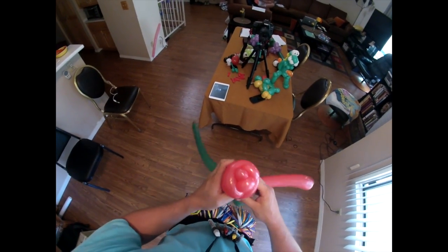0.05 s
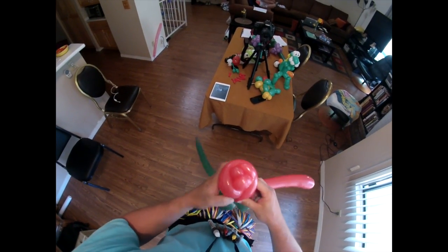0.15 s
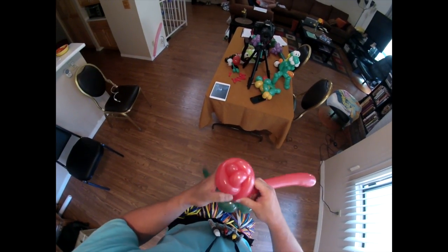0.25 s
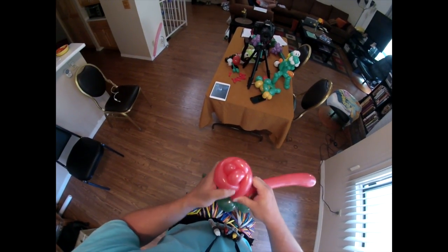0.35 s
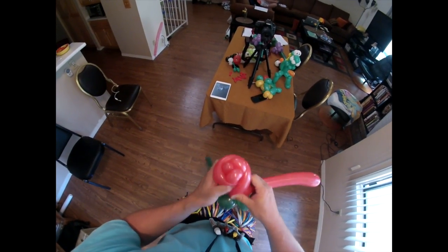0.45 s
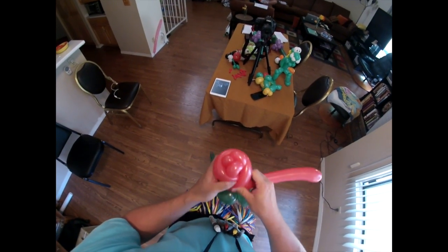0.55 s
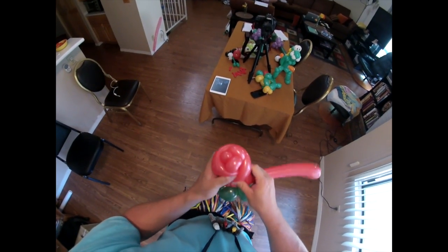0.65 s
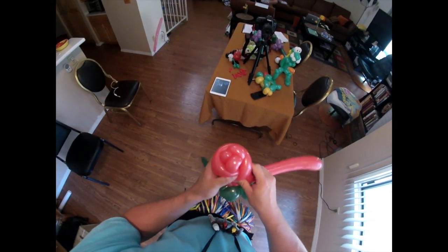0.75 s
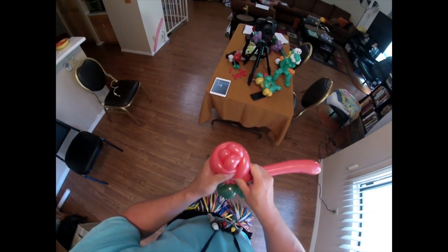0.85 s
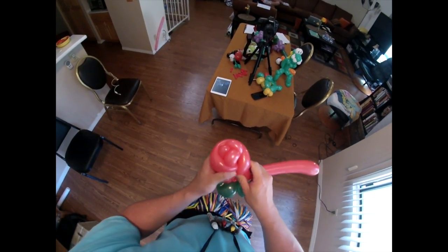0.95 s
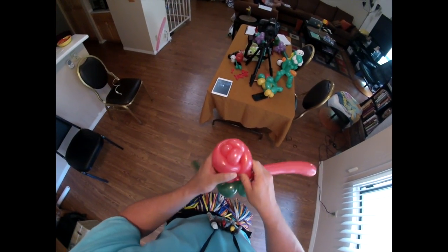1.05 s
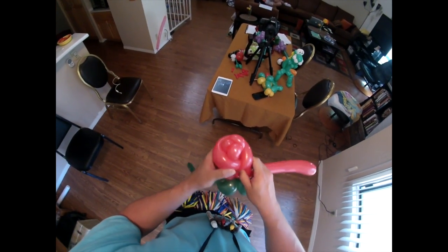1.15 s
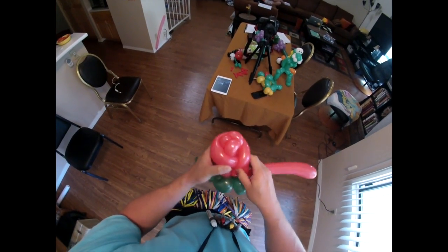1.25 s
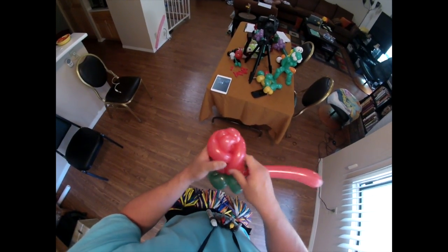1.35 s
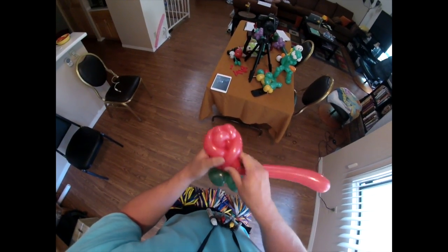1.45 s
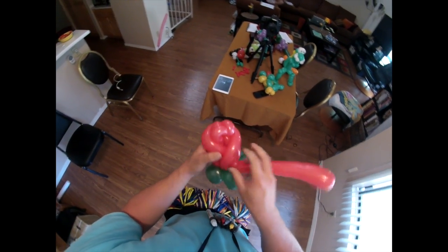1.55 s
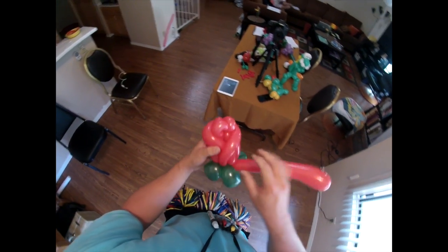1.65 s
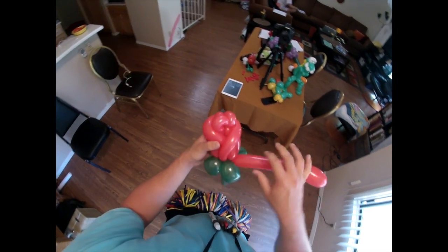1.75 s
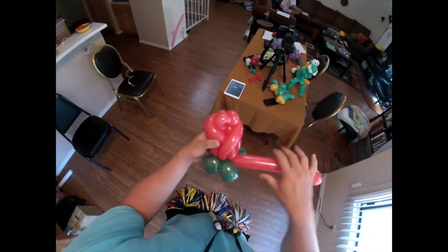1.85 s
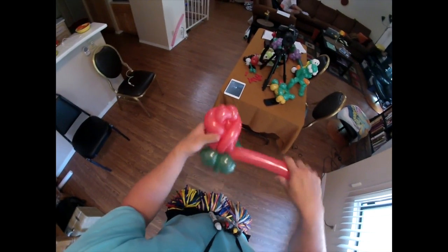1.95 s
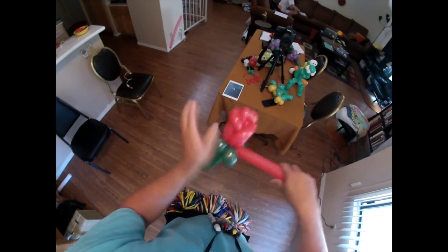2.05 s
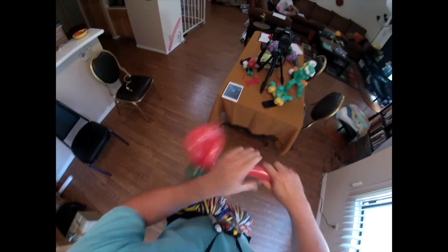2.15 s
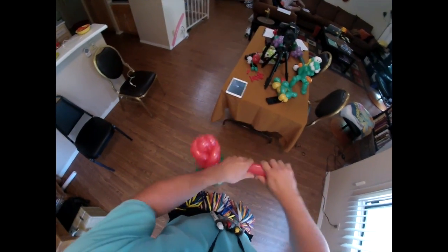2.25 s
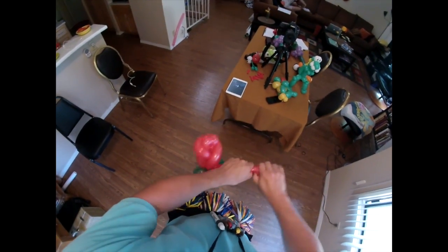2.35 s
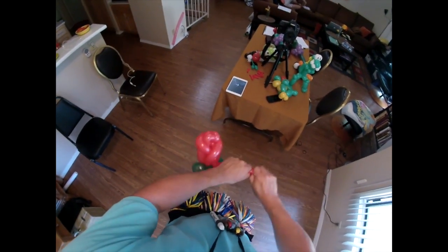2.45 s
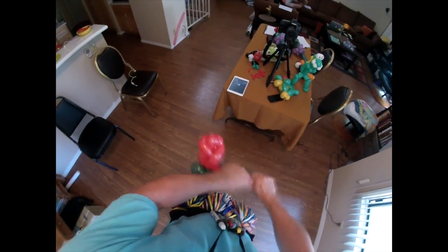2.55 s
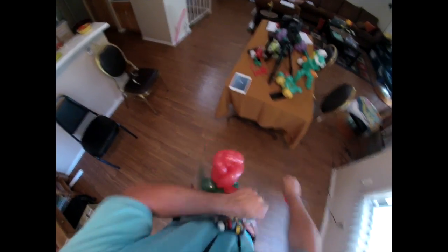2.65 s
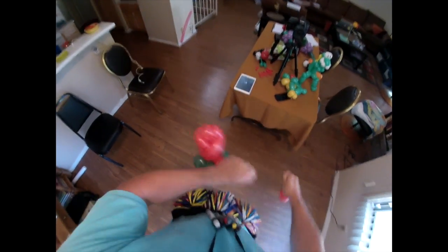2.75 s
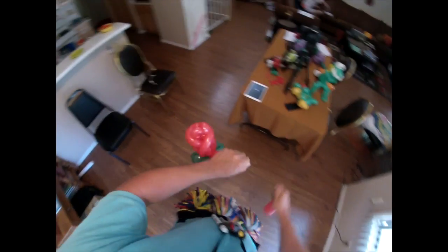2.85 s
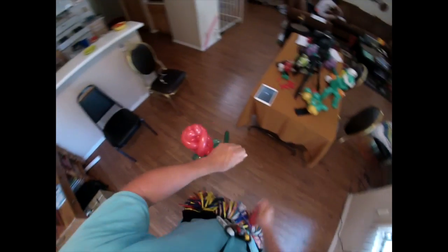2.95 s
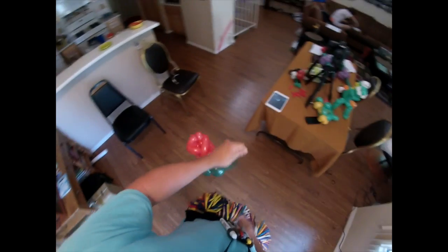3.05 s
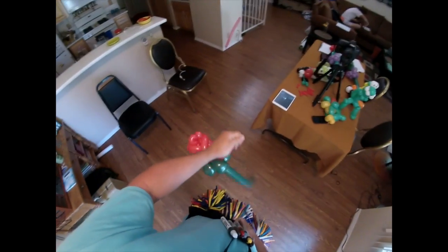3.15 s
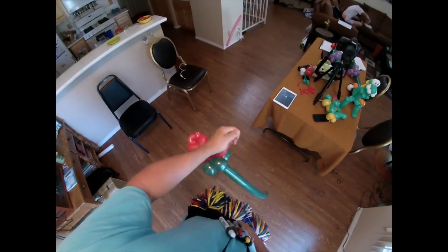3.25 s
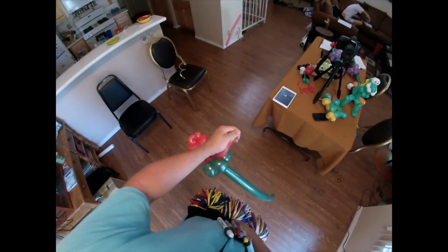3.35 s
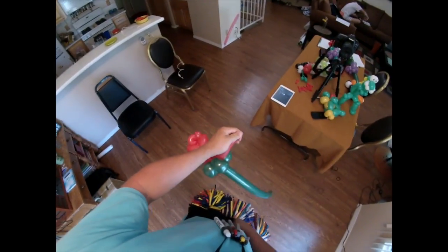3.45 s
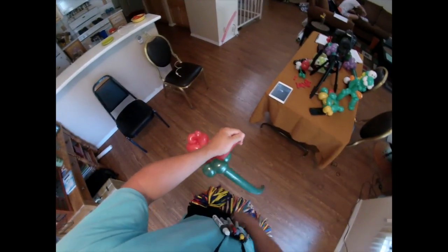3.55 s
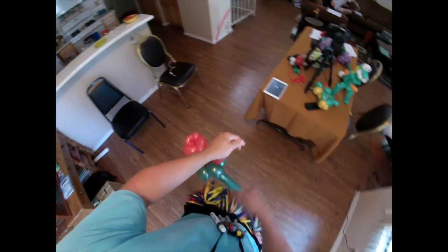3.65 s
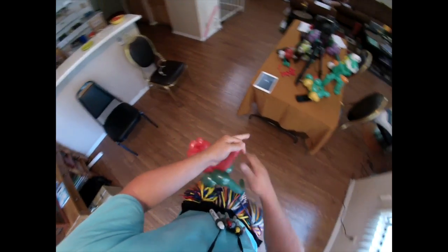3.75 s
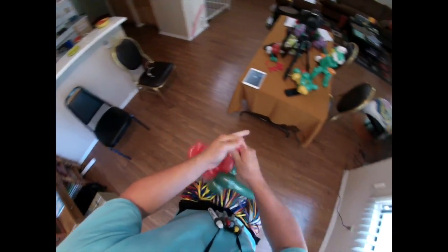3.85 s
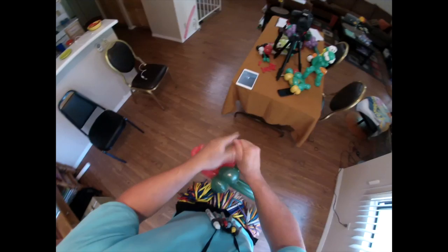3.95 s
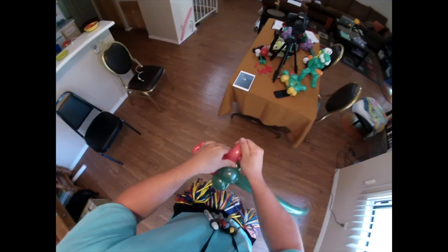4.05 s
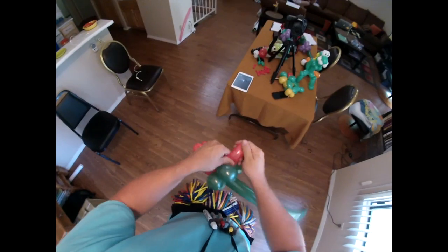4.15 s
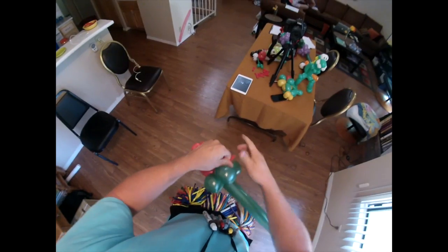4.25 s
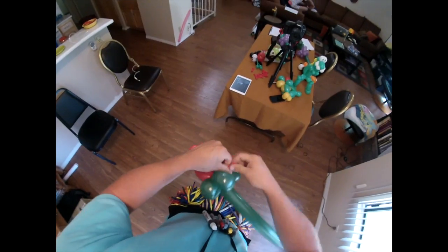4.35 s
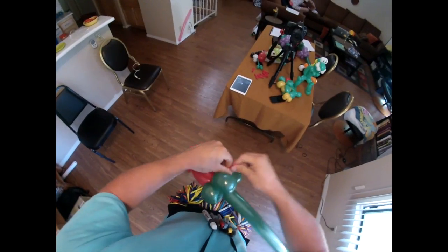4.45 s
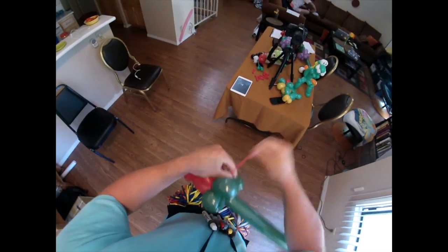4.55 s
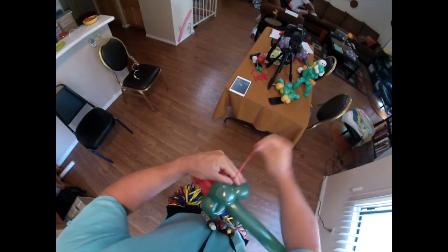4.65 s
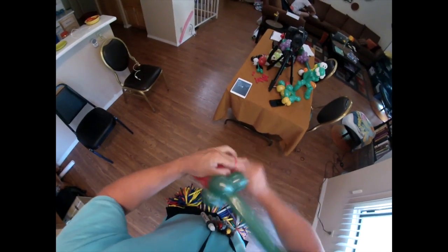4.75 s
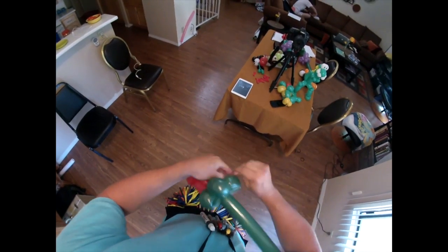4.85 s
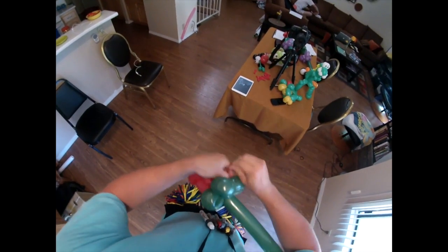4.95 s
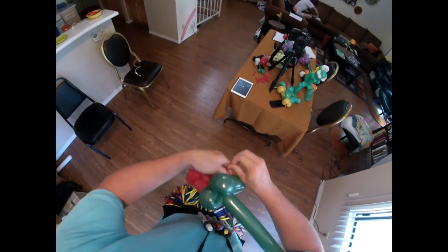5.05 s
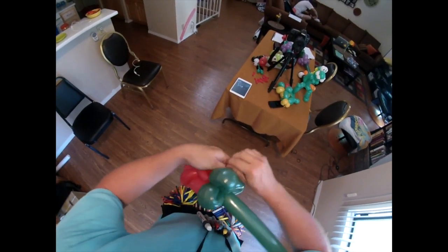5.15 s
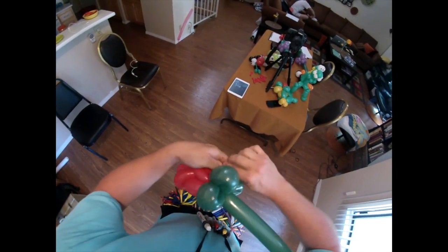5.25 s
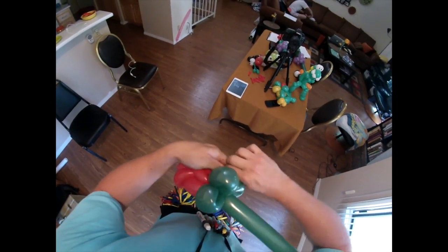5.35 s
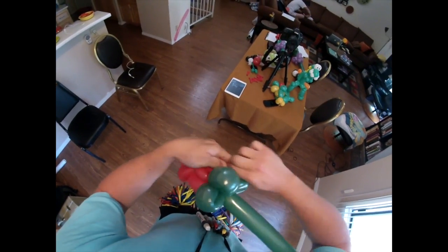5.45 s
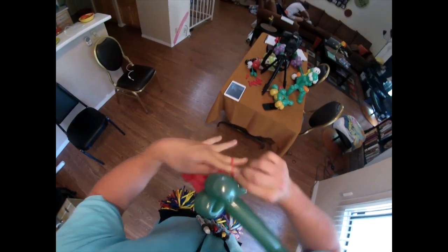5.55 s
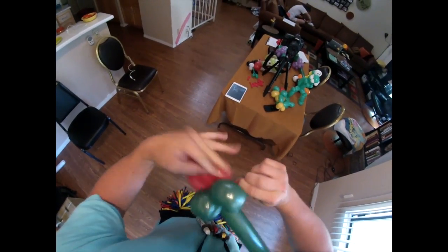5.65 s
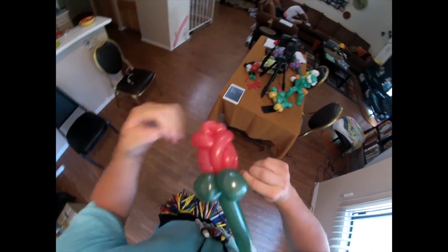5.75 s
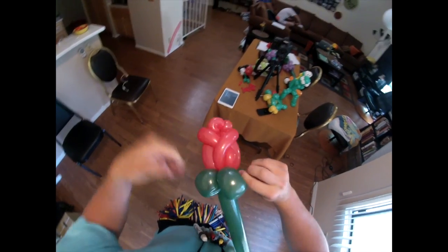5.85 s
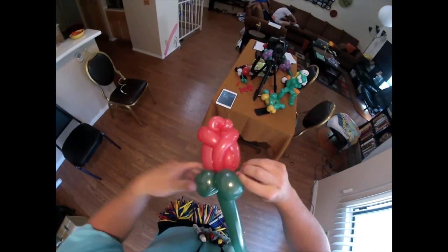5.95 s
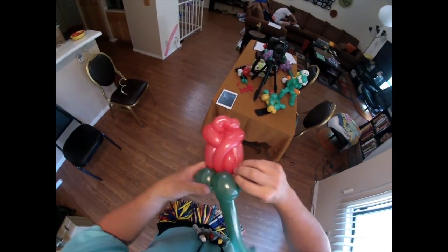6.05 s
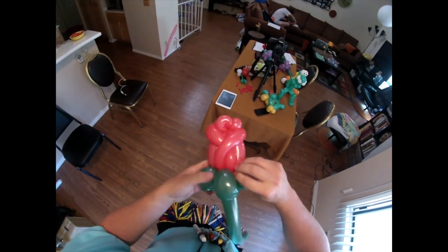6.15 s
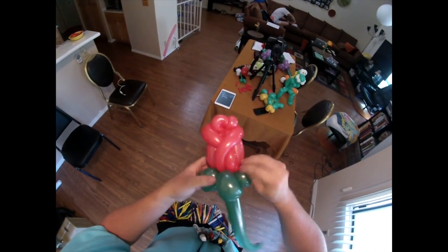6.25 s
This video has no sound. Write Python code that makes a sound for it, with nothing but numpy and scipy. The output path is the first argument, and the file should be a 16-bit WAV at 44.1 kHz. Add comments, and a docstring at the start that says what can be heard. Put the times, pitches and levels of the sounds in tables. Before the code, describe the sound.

Very close, in a living room, hands work latex balloons beneath a head-worn microphone. From 0 s dense rubbing squeaks and crackles, with hollow resonance around 2 kHz; short creaks at 0.25 and 0.75 s, then a cluster of sharp ticks from 1.0 to 1.7 s with a dull bump near 1.2. Rubbing fades by 1.8 to 2.5 s, with faint creaks and soft bumps. At 2.67 s a balloon tears: a loud, clipped pop with quick flaps, a low slosh of pressure, and air rushing out with thin high whistles until 3 s. A sharp tick and squeaks follow at 3.15 s, then near quiet. Brighter snaps and squeaks come at 4.0 and 4.28 s, then small ticks, creaks and muffled bumps until 6.3 s. Low air rumble and steady hiss persist, with millisecond dropouts about four times a second and a short room echo.

```python
"""Balloon twisting and a pop

Hands twist and knot latex balloons in a living room, close to a head-worn camera.
Rubber sticks and slips on rubber and skin: random slips drive resonant filters, squeaks are wavering sines.
One balloon is torn open: noise bursts make the pop, shaped noise the rush of air and thin tones the whistle.
The moving head stirs slow, low-pitched air at the microphone; dull bumps and steady hiss lie beneath.
The recorder restarts about four times a second, and each restart cuts the level for a few milliseconds."""
import sys
import numpy as np
from scipy import signal
from scipy.fft import rfft, irfft
from scipy.io import wavfile
from scipy.ndimage import uniform_filter1d

SR = 44100
rng = np.random.default_rng(int(sys.argv[2]) if len(sys.argv) > 2 else 0)


def transcribe(u):
    """Save the signal u as a 16-bit wav file named by the first command-line argument.

    u: samples, shape (n,) or (channels, n), limited to [-1, 1]; the rate is SR.
    q: integer samples, one column per channel.
    """
    v = np.clip(np.atleast_2d(u).T, -1, 1)
    q = np.round(v * 32767).astype(np.int16)
    wavfile.write(sys.argv[1], SR, q)


N = 277830  # length in samples

# Hands working the rubber, before a small trim: start_s [s], level_db [dB], bright_db [dB], hollow_db [dB]
RUBBING = [(0.0, -33, 1, 0), (0.64, -35, 0, 4.5), (0.83, -46, 3, 5.5), (1.07, -38.5, 4, -2),
           (1.27, -40.5, 2, -17), (1.52, -34, 0, 5), (1.76, -49.5, 5.5, 1), (2.1, -49, 0.5, -8),
           (2.66, -46.5, 1, 7.5), (2.67, -78, 0, 0), (2.97, -80, 0, 0), (3.0, -45, 4, 7.5),
           (3.67, -56, 5.5, -2), (3.87, -40.5, 1, 5), (4.06, -45.5, 3, -2), (4.3, -35.5, -9, -1),
           (4.75, -46.5, 3, 8.5), (5.29, -38, -0.5, 2.5), (5.74, -41.5, 1.5, 4), (5.88, -50.5, -4, -4),
           (6.08, -46.5, 4.5, 7), (6.3, -45, 2, -4)]
# Resonances of the balloons' air chambers, before chance spread: pitch_hz [Hz], width_hz [Hz], level_db [dB]
CHAMBERS = [(830, 7.1, -25), (1380, 19, -13), (1994, 5.5, 6.5), (2334, 130, 1.5), (3250, 230, -13),
            (4195, 114, -7), (5070, 35, -13), (5330, 110, -35), (6683, 310, -13), (8100, 110, -21.5),
            (9400, 36, -39), (11300, 370, -26.5)]
# Broad colour of a slip on the skin: pitch_hz [Hz], density_db [dB per Hz, relative]
SKIN_COLOUR = [(180, -32), (300, -15), (1220, -5.5), (1370, 0.5), (1810, -5.5), (2280, -1), (2610, -3.5),
               (6050, -15), (6790, -15.5), (15500, -37.5)]
# Slow air at the microphone, before surges and ducking: start_s [s], level_db [dB]
AIR_LEVEL = [(0.0, -34), (0.63, -27), (1.1, -39.5), (1.16, -18), (1.24, -35.5), (1.65, -29.5),
             (1.77, -34.5), (2.45, -17.5), (2.63, -31), (2.7, -3), (2.75, -17), (2.82, 4.5), (3.14, -27.5),
             (3.18, -21), (3.58, -36.5), (3.65, -19.5), (3.89, -30.5), (4.0, -24), (4.44, -29), (5.07, -26),
             (5.65, -31), (5.77, -16.5), (6.05, -27.5), (6.3, -39.5)]
# Spectrum of the slow air: pitch_hz [Hz], density_db [dB per Hz, relative]
AIR_COLOUR = [(4.7, -65), (8.0, 10.5), (23, -2.5), (30, -14), (43, -7.5), (60, -17.5), (110, -39.5),
              (140, -63), (240, -120)]
# Spectrum of the flutter above it: pitch_hz [Hz], density_db [dB per Hz, relative]
FLUTTER_COLOUR = [(41, -50), (70, 4), (119, -1.5), (211, -4.5), (408, -22), (600, -19), (780, -23),
                  (1320, -120)]
# Sloshes of air after the pop, before their soft onset: start_s [s], pitch_hz [Hz], t60_s [s], level_db [dB]
SLOSHES = [(2.682, 26.4, 0.13, 7), (2.791, 11.43, 0.72, 2.5)]
# Slow air just before some of the restarts: restart_number [count from 0], pressure [full scale 1]
RESTART_PRESSURE = [(0, .024), (2, .042), (9, .07), (10, -.173), (11, .036), (15, .114), (18, .041),
                    (20, -.045), (21, .047), (22, .101)]
# Spectrum of the steady hiss: pitch_hz [Hz], density_db [dB per Hz, relative]
HISS_COLOUR = [(120, -13), (200, -9), (258, -1), (392, -7), (1260, -13.5), (1430, -8), (2020, -14.5),
               (2330, -14.5), (4660, -18.5), (11800, -24), (15500, -26.5)]
# Decay of the room: pitch_hz [Hz], t60_s [s]
ROOM_DECAY = [(500, 0.75), (1500, 0.63), (4000, 0.21), (7000, 0.53), (11000, 0.52)]
# Single slips, before the scrape and ring trims: start_s [s], level_db [dB], bright_db [dB]
TICKS = [(0.0453, -12, -3), (0.7821, -18, -8), (1.0216, -19, 4), (1.1487, -20, 8), (1.1578, -15, 1),
         (1.192, -10, -14), (1.2038, -10.5, -9), (1.259, -20, -11), (1.3463, -15, -12), (1.4087, -13, 3),
         (1.5263, -13, 5), (1.5514, -10, 3), (1.5613, -8, -10), (1.725, -18, -26), (3.1557, -7.5, 4.5),
         (3.305, -18, -8), (3.3573, -19, -10), (4.1993, -17, 0), (4.2313, -16.5, -3), (4.578, -27.5, 15),
         (4.8482, -25, 9), (4.908, -18.5, 5), (5.0894, -23.5, 14), (5.1746, -21, 10.5), (5.3535, -17, -11),
         (5.373, -24.5, 10), (5.9901, -23.5, 0), (6.0386, -19, 2.5)]
# Runs of quick slips; the bubble under the fingers has a pitch and a level relative to the run:
# start_s [s], length_s [s], level_db [dB], bright_db [dB], hollow_db [dB], ring_hz [Hz], ring_db [dB]
CREAKS = [(0.234, 0.015, -27, 5.5, -19, 2200, -5), (0.255, 0.048, -30, 1, 5, 6830, -21),
          (0.619, 0.057, -46, 9, -18, 3000, 1), (0.73, .05, -36.5, 1.5, 6, 2130, -6),
          (0.819, 0.049, -37.5, 2, 2, 2070, -14), (1.049, 0.059, -33.5, 5, 2.5, 2400, 0.5),
          (1.353, 0.079, -34, -2.5, 1, 2240, -18), (1.566, 0.046, -26.5, -10, 1, 2060, -18),
          (2.036, 0.036, -48.5, 7.5, 7, 3650, -7), (2.266, 0.046, -43.5, -3, 6.5, 2370, -18),
          (2.346, 0.072, -42, -11, 4, 1630, -4), (2.476, 0.03, -40, 4, -7, 3000, -5),
          (3.045, .05, -43, -1, -1, 2380, 0.5), (3.173, .024, -23.5, -9, -3.5, 2360, -7),
          (3.195, 0.07, -43, -1, 1, 1460, 2), (3.625, 0.047, -45, 2.5, 2, 1030, -4),
          (3.982, .011, -28.5, 10, -8, 3540, -6), (3.994, 0.013, -25, 5, 4.5, 5240, -10),
          (4.131, 0.14, -47, 4, -3, 2360, 3), (4.278, .024, -19.5, 1.5, 1, 4570, -6.5),
          (4.312, 0.015, -23.5, 0, -5, 2620, -6), (4.964, .018, -38.5, 5.5, 10.5, 4970, -18),
          (5.225, 0.062, -38, 0, 9.5, 4200, -9), (5.302, 0.15, -42.5, 1.5, 9.5, 2300, -23),
          (5.674, .03, -36.5, -4, 0, 1480, -4.5), (5.725, .032, -34, 2, 6.5, 3300, -5.5),
          (5.763, 0.0082, -30.5, 6, 7.5, 2310, 3), (6.121, 0.078, -44, 1.5, 8, 2280, -2.5),
          (6.203, 0.057, -40, 3, -1, 4400, -11)]
# Dull bumps carried to the camera, before onset and sag: start_s [s], level_db [dB], pitch_hz [Hz], t60_s [s]
THUMPS = [(1.202, -30.5, 86, 0.072), (1.767, -22.5, 51.7, 0.061), (1.955, -24.5, 64, 0.055),
          (4.585, -30, 110, 0.077), (5.027, -20, 232, 0.08), (5.076, -37, 232.5, 0.31),
          (5.312, -32.5, 200, 0.068), (5.553, -36, 211, 0.12), (5.647, -36.5, 211, 0.17)]
# Thin tones of squeaking rubber and whistling air, before wavering:
# start_s [s], length_s [s], start_hz [Hz], end_hz [Hz], level_db [dB], blur_hz [Hz rms]
TONES = [(2.402, 0.013, 2940, 2900, -37, 40), (2.847, 0.075, 7950, 7880, -25, 89),
         (2.87, 0.086, 10400, 10980, -34.5, 70), (2.912, 0.012, 10300, 8500, -30, 200),
         (2.92, .008, 15300, 14500, -36, 300), (3.865, 0.07, 2450, 2430, -41, 30),
         (3.945, .02, 2740, 2960, -37, 30), (3.987, 0.01, 2260, 2260, -28, 30),
         (4.275, 0.042, 1370, 1424, -21.5, 30), (2.938, 0.063, 7700, 7500, -40, 150),
         (3.157, 0.0117, 1095, 1050, -31.5, 58.7), (3.179, 0.032, 1450, 1530, -32.5, 70),
         (3.288, 0.014, 1470, 1500, -42, 40), (4.277, 0.025, 2293, 2295, -17.5, 40)]
# Spectrum of the pop: pitch_hz [Hz], density_db [dB per Hz, relative]
POP_COLOUR = [(290, -72), (500, -20), (2130, -6.5), (2230, 1), (3330, -11), (3960, 3), (5590, 0),
              (6450, -2), (9240, -22), (11800, -14), (15500, -29)]
# Air leaving the torn balloon, before a small trim and flapping: start_s [s], level_db [dB]
RUSH_LEVEL = [(2.69, -18.5), (2.756, -25.5), (2.936, -41.5), (3.0, -47.5)]
# Spectrum of that air: pitch_hz [Hz], density_db [dB per Hz, relative]
RUSH_COLOUR = [(240, -28), (400, -29), (957, -14), (1400, -3.5), (3300, -2), (4090, -2), (6380, -2),
               (11400, -18), (15500, -29)]

HISS_DB = -50.5
FLUTTER_DB, FLUTTER_FOLLOWS, CALM_DB = -49, 0.13, -34  # flutter rises by a share of the air's excess over calm
SURGE_DB, SURGE_S = 2, 0.11  # rms depth and smoothing of chance surges of the air
QUIET_PRESSURE = 0.015  # rms pressure before the other restarts, full scale 1
SLIPS_PER_S, STROKE_S, HURRY = 560, .05, .45  # slip rate setting for this stroke; shorter ones hurry by a power
UNEVEN = .36  # spread of the gaps between slips
TICK_HZ, TICK_SPREAD = 2267, 0.011  # bubble pitch of a tick and its chance spread (fraction)
THUMP_TOP_HZ, PUFF_DB = 300, 2.5  # top of the puff of noise, and its level against the thump
SAG_S = 0.118  # the pitch of a push halves in this time
POP_S, POP_DB = 2.672, 0.5
FIRST_S, PERIOD_S = .19915, .256  # first restart, and spacing
EDGE_HZ = 15400  # top of the recorder's band


def gain_of(db):
    """Turn decibels into an amplitude factor."""
    return 10 ** (np.asarray(db) / 20)


def evened(x):
    """Scale a signal to rms 1."""
    return x / np.sqrt(np.mean(x ** 2) + 1e-20)


def read(points, hz):
    """Read a curve over log frequency."""
    f, value = np.transpose(points)
    return np.interp(np.log(hz + 1), np.log(f + 1), value)


def along(rows):
    """Draw each column as a line over the whole scene."""
    s, *columns = np.transpose(rows)
    return [np.interp(np.arange(N) / SR, s, c) for c in columns]


def add(mix, s, sound):
    """Lay a sound into the mix at a time in seconds."""
    part = mix[round(s * SR):][:len(sound)]
    part += sound[:len(part)]


def wander(window, size=N):
    """Slow random drift of rms 1, smoothed over a window of samples."""
    return evened(uniform_filter1d(rng.standard_normal(size), window))


def noise(points):
    """Steady noise of a given spectrum, rms 1."""
    spectrum = rfft(rng.standard_normal(N))
    return evened(irfft(spectrum * gain_of(read(points, np.fft.rfftfreq(N, 1 / SR))), N))


def response(db):
    """Minimum-phase impulse response of energy 1 for a gain on 2049 bins."""
    both_sides_db = np.r_[db, db[-2:0:-1]]
    log_gain = np.log(gain_of(np.maximum(both_sides_db, -100)))
    h = np.fft.ifft(np.exp(np.conj(signal.hilbert(log_gain)))).real[:2048]
    return h / np.linalg.norm(h)


def balloons(plain, bright, hollow, vary_db):
    """Slips ring the balloons, now one bubble and now another; shares go to the treble and the low chambers."""
    hz, t = np.fft.rfftfreq(4096, 1 / SR), np.arange(800) / SR
    treble_filter = signal.butter(2, 3400, "high", fs=SR, output="sos")
    low_filter = signal.butter(2, 1150, "low", fs=SR, output="sos")
    treble = signal.sosfilt(treble_filter, bright - plain)
    low = signal.sosfilt(low_filter, hollow - plain)
    drive = plain + treble + low
    bubbles = rng.standard_normal((6, len(CHAMBERS), 2))  # chance level and pitch of every resonance
    touched = uniform_filter1d(rng.standard_normal((len(bubbles), N)), 1200).argmax(0)
    out = np.zeros(N)
    for k, bubble in enumerate(bubbles):
        modes = 0
        for (f, width_hz, db), (level_luck, pitch_luck) in zip(CHAMBERS, bubble):
            power = gain_of(2 * (db + vary_db * level_luck - read(SKIN_COLOUR, f)))
            centre_hz = f * (1 + 0.013 * pitch_luck)
            modes = modes + power / (1 + (2 * (hz - centre_hz) / width_hz) ** 2)
        body = response(read(SKIN_COLOUR, hz) + 10 * np.log10(abs(0.41 + 0.61 * modes)))
        # hands and skins scatter each slip
        scatter = (t == 0) + 0.13 * np.exp(-t / 0.0039) * rng.standard_normal(len(t))
        body = np.convolve(body, scatter / np.linalg.norm(scatter))
        out += signal.oaconvolve(drive * (touched == k), body)[:N]
    return out


def rub():
    """Dense uneven slips that come in clumps, over a soft sliding hiss."""
    level_db, bright_db, hollow_db = along(RUBBING)
    clumps = gain_of(2.2 * wander(300))
    size = gain_of(4.0 * np.minimum(rng.exponential(size=N), 4))
    happens = rng.random(N) < 1500 / SR  # slips per second
    slips = size * happens * np.sign(rng.standard_normal(N))
    sliding = 0.3 * rng.standard_normal(N)
    drive = gain_of(level_db - 2.0) * evened(clumps * (evened(slips) + sliding))
    return balloons(drive, drive * gain_of(bright_db), drive * gain_of(hollow_db), vary_db=3.0)


def air():
    """Lumpy pressure mostly under 100 Hz, a flutter above it and two dying sloshes."""
    level_db, = along(AIR_LEVEL)
    t = np.arange(N) / SR
    # the slow air ducks while the sloshes take over
    duck = 1 - 0.81 * np.clip((t - 2.63) / 0.038, 0, 1) * np.clip((3.08 - t) / 0.11, 0, 1)
    flutter_db = FLUTTER_DB + FLUTTER_FOLLOWS * (level_db - CALM_DB)
    surge_db = SURGE_DB * wander(round(SURGE_S * SR))
    slow = gain_of(level_db + surge_db) * duck * noise(AIR_COLOUR)
    out = slow + gain_of(flutter_db + surge_db) * noise(FLUTTER_COLOUR)
    for s, hz, t60, db in SLOSHES:
        swell_and_die = gain_of(db - 60 * t / t60) * (1 - np.exp(-t / 0.021))
        add(out, s, -swell_and_die * np.sin(2 * np.pi * hz * t))
    # the air drifts towards its pressure at each restart
    lean = np.r_[np.sin(np.linspace(0, np.pi / 2, 900)) ** 2, np.ones(40)]
    for k, s in enumerate(np.arange(FIRST_S, N / SR, PERIOD_S)):
        pressure = dict(RESTART_PRESSURE).get(k, QUIET_PRESSURE * rng.standard_normal())
        add(out, s - 900 / SR, lean * (pressure - out[round(s * SR)]))
    return out


def hiss():
    """Steady coloured noise under everything."""
    return gain_of(HISS_DB) * noise(HISS_COLOUR)


def room(x):
    """Sparse taps of random sign, each band dying at its own speed."""
    taps, slots = np.zeros(SR), np.arange(300, SR - 20, 20)
    taps[slots + rng.integers(0, 20, len(slots))] = np.sign(rng.standard_normal(len(slots)))
    hz, t, bands = signal.stft(taps, SR, nperseg=256)
    t60 = np.maximum(read(ROOM_DECAY, hz), .05)
    bands = bands * gain_of(-60 * t / t60[:, None])
    tail = signal.istft(bands, SR, nperseg=256)[1]
    return signal.fftconvolve(x, tail / np.linalg.norm(tail))[:N]


def ring(t, hz):
    """A small bubble rings briefly; energy 1."""
    sound = gain_of(-60 * t / 0.017) * np.sin(2 * np.pi * hz * t)
    return sound / np.linalg.norm(sound)


def ticks():
    """Each tick is one slip: a short scrape that drives the balloons, and a ringing bubble."""
    plain, bright, hollow, rings = drives = np.zeros((4, N))
    t = np.arange(600) / SR
    fade = np.exp(-t / .0014)
    for s, db, bright_db in TICKS:
        scrape = gain_of(db + 6.0) * fade * rng.standard_normal(len(t)) / np.linalg.norm(fade)
        add(plain, s, scrape)
        add(bright, s, scrape * gain_of(bright_db))
        add(hollow, s, scrape * gain_of(-2.5))
        bubble_hz = TICK_HZ * (1 + TICK_SPREAD * rng.standard_normal())
        add(rings, s, gain_of(db - 4.0) * ring(t, bubble_hz))
    return drives


def creaks():
    """Each creak is a stick-slip train with uneven gaps that drives the balloons and one bubble."""
    plain, bright, hollow, rings = drives = np.zeros((4, N))
    t = np.arange(600) / SR
    for s, length, db, bright_db, hollow_db, ring_hz, ring_db in CREAKS:
        gap, size = rng.standard_normal((2, 200))
        rate = SLIPS_PER_S * (STROKE_S / length) ** HURRY
        at = np.cumsum(np.exp(UNEVEN * gap)) * SR / rate
        at = at - at[0]
        train = np.zeros(round(length * SR))
        keep = at < len(train) - 1
        train[at[keep].astype(int)] = gain_of(4.5 * size[keep])
        swell = np.minimum(1, np.linspace(1.8, .5, len(train)))  # holds, then eases off
        train = gain_of(db) * evened(train) * swell
        add(plain, s, train)
        add(bright, s, train * gain_of(bright_db))
        add(hollow, s, train * gain_of(hollow_db))
        add(rings, s, gain_of(ring_db) * np.convolve(train, ring(t, ring_hz)))
    return drives


def slips():
    """Ticks and creaks ring the same balloons, beside their own small bubbles."""
    plain, bright, hollow, rings = ticks() + creaks()
    return rings + balloons(plain, bright, hollow, vary_db=1.5)


def thumps():
    """Each bump is a low push of sinking pitch with a puff of noise; it starts quickly and dies."""
    out, t = np.zeros(N), np.arange(6000) / SR
    band = signal.butter(3, [70, THUMP_TOP_HZ], "band", fs=SR, output="sos")
    for s, db, hz, t60 in THUMPS:
        puff = gain_of(PUFF_DB) * evened(signal.sosfilt(band, rng.standard_normal(len(t))))
        cycles = hz * SAG_S * np.log(1 + t / SAG_S)
        push = -2 * np.sin(2 * np.pi * cycles)
        envelope = gain_of(db - 60 * t / t60) * (1 - np.exp(-t / 0.01))
        add(out, s, envelope * (puff + push))
    return out


def tones():
    """Squeaks and whistles: gliding sines whose pitch and strength waver."""
    out = np.zeros(N)
    for s, length, start_hz, end_hz, db, blur_hz in TONES:
        waver, throb = wander(90, (2, 8000))
        n = round(length * SR)
        hz = np.linspace(start_hz, end_hz, n) + blur_hz * waver[:n]
        tone = np.sin(2 * np.pi * np.cumsum(hz) / SR)
        add(out, s, gain_of(db + 2.4 * throb[:n]) * tone * signal.windows.tukey(n, .4))
    return out


def tear():
    """The skin tears in a few milliseconds and flaps twice: decaying bursts of coloured noise."""
    t, out = np.arange(4000) / SR, np.zeros(N)
    envelope = gain_of(-60 * np.maximum(t - .0025, 0) / 0.0049)
    envelope += gain_of(-25 - 60 * t / 0.068)  # quieter, longer tail
    for lag_s, db in (.006, -5.5), (.0125, -6):
        envelope += gain_of(db - 60 * (t - lag_s) / 0.0073) * (t > lag_s)
    add(out, POP_S, gain_of(POP_DB) * envelope * rng.standard_normal(len(t)))
    hz = np.fft.rfftfreq(4096, 1 / SR)
    return signal.oaconvolve(out, response(read(POP_COLOUR, hz)))[:N]


def rush():
    """Air rushes out past the flapping torn edge: coloured noise of fluctuating level."""
    t = np.arange(N) / SR
    level_db, = along([*RUSH_LEVEL, (3.05, -73)])
    flapping = gain_of(2.5 * wander(250))
    return gain_of(level_db - 2.0) * (t > POP_S) * noise(RUSH_COLOUR) * flapping


def scene():
    """Mix the handled rubber, the burst, their echo in the room, the air, the bumps and the hiss."""
    near = rub() + slips() + tones()
    burst = tear() + rush()
    echo = gain_of(-6.5) * room(near) + gain_of(-14.0) * room(burst)
    return (near + burst + echo + air() + thumps() + hiss())[None]


def record(dry):
    """The gain drops at each restart and climbs back; loud peaks clip and the band is limited."""
    t = np.arange(N) / SR - FIRST_S
    since = np.where(t < 0, 1, t % PERIOD_S)
    gain = np.clip(0.011 + since / 0.012, 0, 1)
    first = (t > 0) & (t < PERIOD_S)
    gain[first] = np.where(since < .0095, .06, 1)[first]  # the first is a plain gap
    loud = np.clip(dry * gain, -.97, .97)
    band_limit = signal.firwin(255, EDGE_HZ, window=("kaiser", 7), fs=SR)
    return signal.oaconvolve(loud, band_limit[None], "same")


dry = scene()
out = record(dry)
transcribe(out)
```